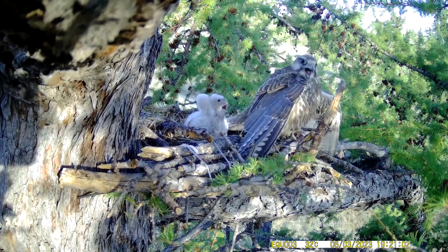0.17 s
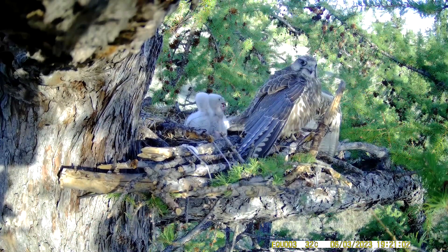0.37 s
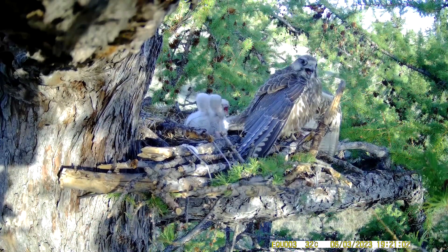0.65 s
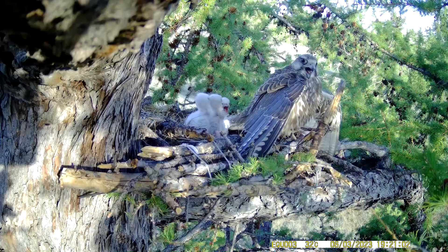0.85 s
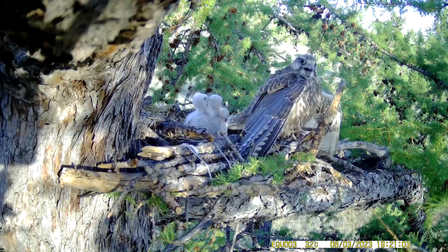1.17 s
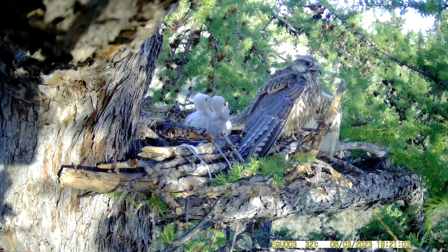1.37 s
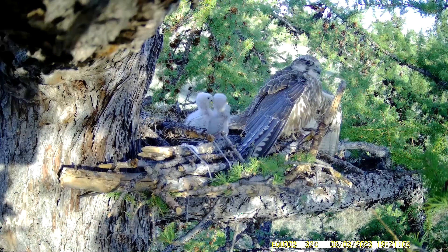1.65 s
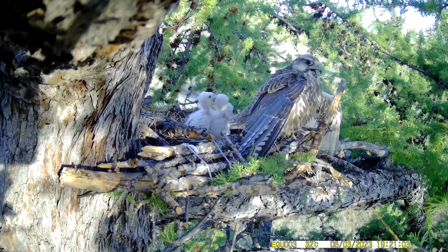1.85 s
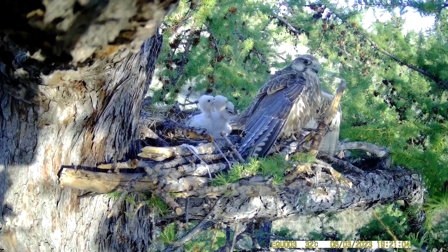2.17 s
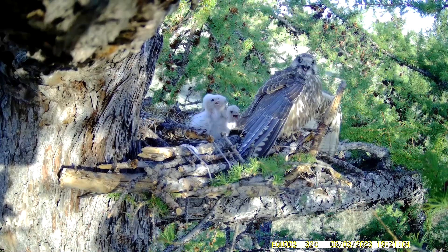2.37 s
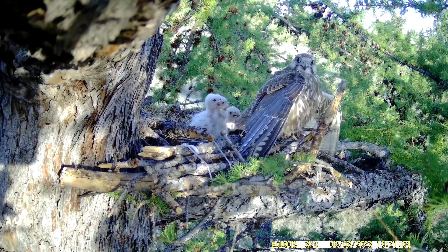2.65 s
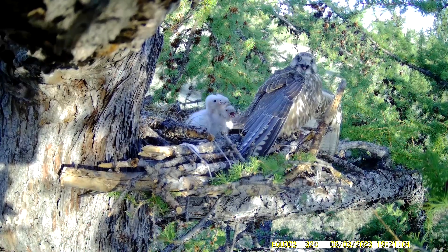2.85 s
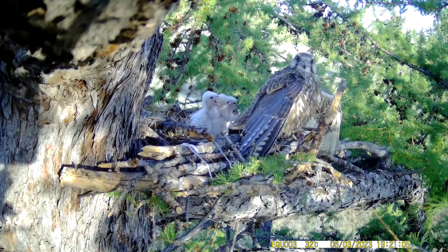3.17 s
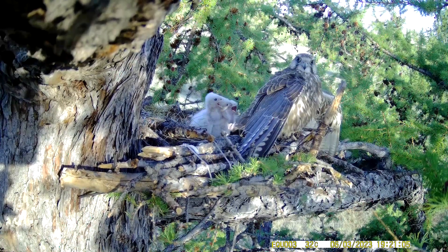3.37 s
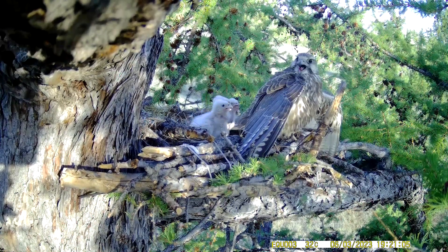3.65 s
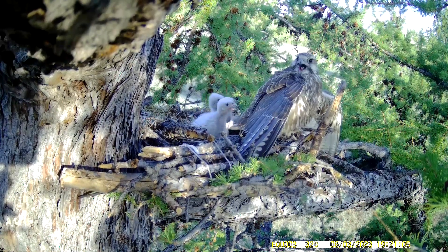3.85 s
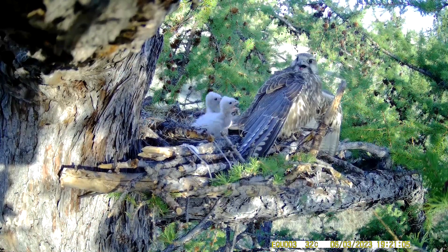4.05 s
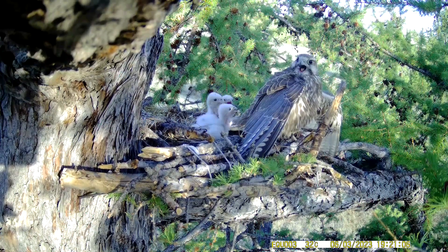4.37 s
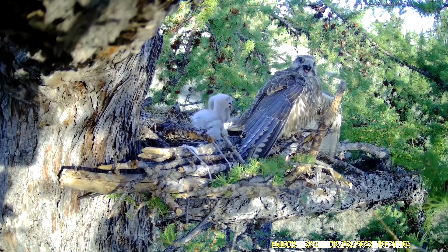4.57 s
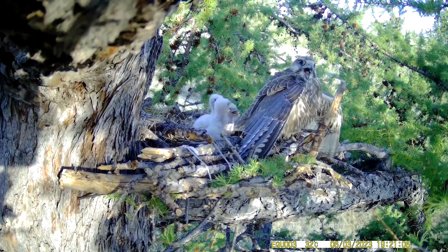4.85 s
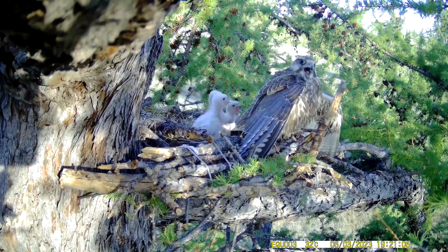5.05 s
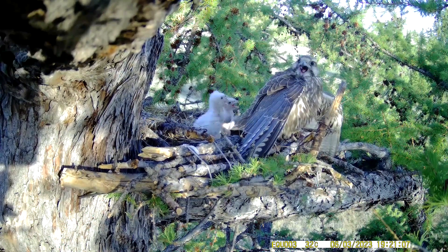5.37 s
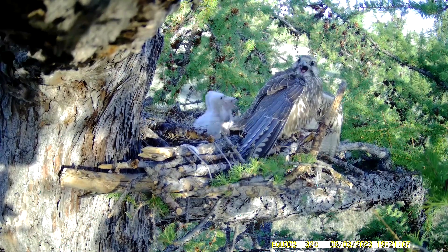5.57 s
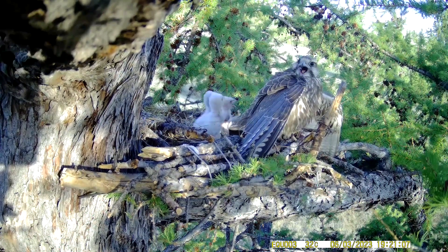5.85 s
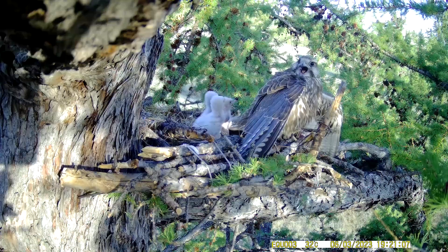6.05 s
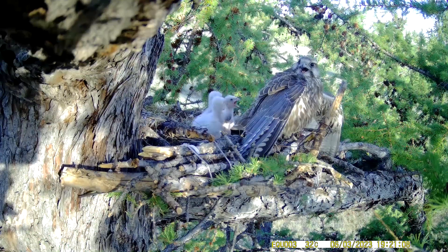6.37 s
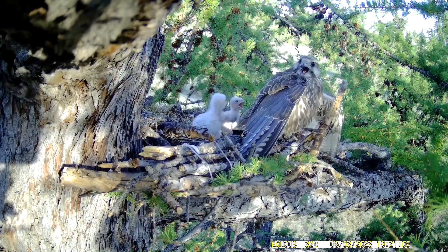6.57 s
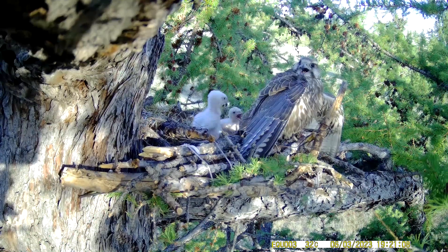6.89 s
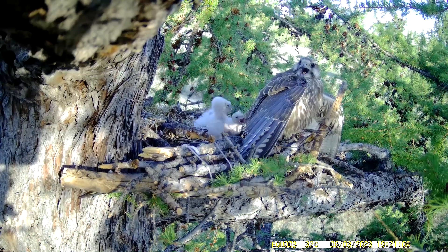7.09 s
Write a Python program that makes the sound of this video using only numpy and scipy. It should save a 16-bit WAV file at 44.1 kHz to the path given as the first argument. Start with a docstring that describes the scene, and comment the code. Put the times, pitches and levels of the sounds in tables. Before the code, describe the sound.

A falcon screams harshly over and over at close range, wheezing faintly between calls, over a low forest rumble.

```python
"""Over a low forest rumble, a falcon stutters into the first of thirteen screams, at its nest high in a
conifer, close to a trail camera's microphone. Each time the syrinx pops open and catches on a clear,
rising tone, turns harsh under strain and cracks as the pressure fails and the pitch falls away.
Trunks echo faintly, soft buffets thump on the camera, and between screams the bird gulps wheezing air."""
import sys
import numpy as np
from scipy import signal
from scipy.fft import rfft, irfft, next_fast_len
from scipy.io import wavfile
from scipy.ndimage import uniform_filter1d

SR = 44100
rng = np.random.default_rng(int(sys.argv[2]) if len(sys.argv) > 2 else 0)


def master(y):
    """Save y as 16-bit WAV."""
    cut = np.clip(np.atleast_2d(y).T, -1, 1)
    pcm = np.round(cut * 32767)  # scale
    wavfile.write(sys.argv[1], SR, pcm.astype(np.int16))


N = 318400
TIME = np.arange(N) / SR

# The ragged catch before each tone: first_pop_s, level_db, ragged_until_s
CATCH_POPS = [(.004, -22, .022), (.484, -24, .505), (1.144, -24, 1.175), (1.745, -23, 1.772),
              (2.207, -26, 2.232), (2.711, -20, 2.74), (3.429, -27, 3.455), (4.191, -23, 4.208),
              (4.765, -24, 4.782), (5.225, -25, 5.245), (5.817, -26, 5.83), (6.388, -26, 6.403),
              (6.923, -24, 6.942)]
# The course of each scream: start_s, end_s, climb_from_hz, climb_to_hz, bend (1 = straight climb),
# offset_hz (until the register jump), jump_after_s, fall_s, fundamental_db, second_db, second_swell_s
SCREAM_SHAPES = [(0.01, 0.324, 1164, 1212, 1.07, -20.0, 0.18, 0.062, -24, -21, 0.032),
                 (0.491, 0.943, 1097, 1244, 1.34, -16.0, 0.0233, 0.063, -23.5, -18, 0.046),
                 (1.151, 1.484, 1158, 1217, 1.17, -49.0, 0.21, 0.069, -25.5, -21.5, 0.042),
                 (1.749, 2.043, 1063, 1126, 1.45, -6.0, 0.035, 0.041, -31.5, -20.5, 0.16),
                 (2.217, 2.555, 1062, 1169, 1.95, 9.0, 0.054, 0.07, -27.3, -16, 0.11),
                 (2.713, 3.071, 1100, 1196, 1.96, -20.0, 0.22, 0.076, -26, -17.5, 0.12),
                 (3.436, 4.064, 1057, 1241, 1.62, 4.0, 0.075, 0.056, -24.0, -19.4, 0.13),
                 (4.198, 4.637, 1146, 1279, 0.86, 110.0, 0.057, 0.058, -22.5, -21.5, 0.083),
                 (4.773, 5.118, 1178, 1257, 0.8, 97.0, 0.042, 0.066, -23.9, -20.0, 0.27),
                 (5.231, 5.693, 1126, 1251, 2.74, 42.0, 0.061, 0.043, -24, -21.5, 0.069),
                 (5.825, 6.268, 1182, 1305, 0.71, 85.5, 0.035, 0.1, -21.5, -21.5, 0.071),
                 (6.397, 6.795, 1186, 1281, 0.82, 98.0, 0.041, 0.081, -22.5, -22.5, 0.068),
                 (6.928, 7.298, 1145, 1259, 1.43, 33, 0.069, 0.074, -23.5, -18.5, 0.31)]


def undb(db):
    """Decibels to gain."""
    return 10 ** (np.asarray(db) / 20)


def unit(x):
    """Scale to rms 1."""
    return x / np.sqrt(np.mean(x ** 2))


def colour(x, points):
    """Causal filter whose gain follows (frequency_hz, gain_db) points."""
    hz, db = np.transpose(points)
    half = next_fast_len(N, real=True)
    size = 2 * half
    bin_hz = np.arange(half + 1) * SR / size
    gain_db = np.interp(np.log(bin_hz + 1), np.log(hz), db)
    cepstrum = irfft(np.log(undb(gain_db)))
    cepstrum[1:half] *= 2  # folding the cepstrum gives minimum phase
    cepstrum[half + 1:] = 0
    return irfft(rfft(x, size) * np.exp(rfft(cepstrum)))[:N]


def noise(points):
    """Coloured noise of rms 1."""
    return unit(colour(rng.standard_normal(N), points))


def walk(rate_hz):
    """Smooth random wander of rms 1, mostly slower than rate_hz."""
    lowpass = signal.butter(2, rate_hz, fs=SR, output="sos")
    return unit(signal.sosfilt(lowpass, rng.standard_normal(N)))


def gate(start, end, edge_s):
    """1 between two times, with soft edges centred on them."""
    inside_s = np.minimum(TIME - start, end - TIME)
    return .5 + .5 * np.sin(np.pi * np.clip(inside_s / edge_s, -.5, .5))


def forest(air_db=-66, rumble_db=-55):
    """The wood around the nest: a faint, steady hiss over a low rumble that swells and sinks."""
    # Spectra of the hiss and the rumble: frequency_hz, gain_db
    air_spectrum = [(100, 0), (300, 0), (600, 0), (1000, -1), (2000, -3), (4500, -5), (6500, -7),
                    (11000, -8), (15500, -9)]
    rumble_spectrum = [(15, -3.5), (32, -3.5), (60, -8), (110, -19.5), (200, -29), (400, -35), (1500, -71)]
    # Slow course of the rumble: time_s, gain_db
    swell = [(0, 3.5), (.6, 5), (1.5, 3.5), (2.3, 6), (2.8, 2), (4.4, -0.5), (5.2, 3), (6.1, 1.5), (7.2, 4)]
    swell_db = np.interp(TIME, *np.transpose(swell))
    air = noise(air_spectrum) * undb(air_db)
    rumble = noise(rumble_spectrum) * undb(rumble_db + swell_db + 2 * walk(26))
    return air + rumble


def syrinx_pops(gap_s=0.0056, quicken=0.76, ring_hz=2250, ring_s=0.0012, attack_s=0.00025, count=4):
    """As each tone catches, the syrinx flaps open a few times, faster and faster."""
    kicks = np.zeros(N)
    for pop_s, level_db, _ in CATCH_POPS:
        for k in range(count):
            kicks[int(pop_s * SR)] += undb(level_db)
            pop_s += gap_s * quicken ** k
    t = TIME[:SR // 50]
    phase = 2 * np.pi * ring_hz * t
    ring = np.sin(phase) + .28 * np.sin(phase / 2) + .14 * np.sin(2 * phase)
    envelope = np.exp(-t / ring_s) * (1 - np.exp(-t / attack_s))
    return signal.fftconvolve(kicks, ring * envelope)[:N]


def voicing(rise_s=0.0095, fall_s=0.01):
    """1 while the syrinx sounds, 0 between screams, with short ramps."""
    ramps_s = np.array([-rise_s, rise_s, -fall_s, fall_s]) / 2
    return sum(np.interp(TIME, ramps_s + [start, start, end, end], [0, 1, 1, 0])
               for start, end, *_ in SCREAM_SHAPES)


def scream_contours(scoop_hz=101, scoop_s=.0105, jump_s=.0088, fall_hz=175.2, swell_s=.1):
    """Pitch and levels: each scream scoops up, jumps register, climbs, and drops as the pressure fails."""
    shapes = np.array(SCREAM_SHAPES)
    current = np.maximum(np.searchsorted(shapes[:, 0] - .02, TIME) - 1, 0)
    (start, end, climb_from_hz, climb_to_hz, bend, offset_hz, jump_after_s, fall_s,
     fundamental_db, second_db, second_swell_s) = shapes[current].T
    age = np.clip(TIME - start, 0, end - start)
    to_climb_hz = (climb_to_hz - climb_from_hz) * (1 - age / (end - start)) ** bend
    register_hz = offset_hz * .5 * (1 - np.tanh((age - jump_after_s) / jump_s))
    scoop = np.exp(-age / scoop_s)
    fall = np.clip(1 - (end - TIME) / fall_s, 0, 1) ** 3
    pitch_hz = climb_to_hz - to_climb_hz + register_hz - scoop_hz * scoop - fall_hz * fall
    # Both partials swell in and grow louder with the climb, the second less closely.
    slack_hz = to_climb_hz - np.minimum(register_hz, 0)
    fundamental_db = fundamental_db - .0387 * slack_hz - 4.5 * np.exp(-age / swell_s)
    second_db = second_db - .0311 * to_climb_hz - 10 * np.exp(-age / second_swell_s)
    second_db += .0059 * np.maximum(register_hz, 0)  # a little stronger in the high register
    bright_db = -6 + .23 * (second_db - fundamental_db)  # overtones partly follow the second's lead
    fundamental_db -= 10 * scoop + 18.5 * fall
    second_db -= 5 * fall  # outlasts the fundamental
    return pitch_hz, fundamental_db, second_db, bright_db


def throat(x):
    """Throat and open beak shape the sound broadly; the windpipe adds narrow peaks and notches."""
    # Response of throat and beak: frequency_hz, gain_db
    throat_response = [(300, -32), (540, -10), (640, -14), (900, -34), (1250, 9.5), (1750, -1), (2350, -20),
                       (2900, 0.5), (3350, -2), (3800, 1), (4750, 1), (5400, -11), (7400, -15),
                       (11000, -23), (12300, -34.5), (15500, -43)]
    # Windpipe peaks and notches: centre_hz, width_hz, centre_gain
    windpipe = [(2715, 233, 6.28), (3578, 142, 0.063), (6007, 170, 0.32), (8370, 1020, 0.4),
                (8710, 234, 3.2), (10050, 680, 0.49)]
    x = colour(x, throat_response)
    for centre_hz, width_hz, gain in windpipe:
        band = signal.lfilter(*signal.iirpeak(centre_hz, centre_hz / width_hz, fs=SR), x)
        x = x + (gain - 1) * band
    return x


def screams(surge_hz=12, surge_db=3, crack_s=0.028, quarter_db=-21, air_db=-13, hollow_db=-37):
    """The syrinx buzzes at the pitch; under strain its cycles alternate and scatter, and air rushes by."""
    # Strained stretches: start_s, end_s, period_doubling_db, roughness (0-1)
    strains = [(.18, .29, -30, .3), (.76, .91, -27, .45), (1.92, 2.0, -19, .05), (2.32, 2.375, -13, .02),
               (2.77, 2.9, -28, .15), (3.66, 3.83, -24, .5), (3.83, 4.04, -19, .85), (4.35, 4.55, -13, .5),
               (4.55, 4.61, -20, 1), (4.93, 5.09, -19, .45), (5.39, 5.66, -14, .75), (5.94, 6.1, -22, .5),
               (6.1, 6.24, -17, .8), (6.58, 6.77, -19, .55), (7.06, 7.24, -16, .6)]
    # Faint hollow rush under the tone: frequency_hz, gain_db
    hollow_spectrum = [(250, -13), (450, -15), (560, -9.5), (700, -3), (1000, -7), (2000, -20)]
    pitch_hz, fundamental_db, second_db, bright_db = scream_contours()
    catching = sum(gate(pop_s, until_s, .005) for pop_s, _, until_s in CATCH_POPS)
    # As the pressure drops at the end of a scream, the tone cracks an octave down.
    cracking = sum(gate(end - crack_s, end + .023, .027) for _, end, *_ in SCREAM_SHAPES)
    doubling = undb(-29) + undb(-8) * cracking
    strain = np.zeros(N)
    for start, end, doubling_db, roughness in strains:
        strained = gate(start, end, .068)
        strain += roughness * strained
        doubling += undb(doubling_db) * strained
    fatigue = uniform_filter1d(strain, SR // 4)
    crackling = cracking * (.3 + 2.2 * fatigue)  # after long strain the crack breaks up
    surge = strain - fatigue  # a sudden harder push
    pitch_hz += surge_hz * surge
    second_db += surge_db * surge

    rough = .28 + strain + catching + .65 * crackling
    quaver = rough * walk(26)  # an unsteady push moves pitch and loudness together
    jitter = (.0035 * rough + .028 * catching + .016 * crackling) * walk(500)
    phase = 2 * np.pi * np.cumsum(pitch_hz * (1 + .0065 * quaver + jitter)) / SR
    shimmer = 1 + .13 * rough ** 2 * walk(300)
    second_gain = undb(second_db + .7 * quaver) * shimmer
    tone = undb(fundamental_db) * np.cos(phase) + second_gain * np.cos(2 * phase + 1)
    # The higher an overtone, the less steady its strength and timing.
    flutter = .003 * walk(380)
    overtones = sum(undb(.2 * k * walk(18)) * np.cos(k * (phase + (k - 3) * flutter))
                    for k in range(3, 14))
    pulses = np.cos(phase) + np.cos(2 * phase) + overtones
    # Strong and weak cycles come and go, adding tones halfway between the partials and at the quarters.
    halves = doubling * undb(3.5 * walk(25) - 1.5) * np.cos(phase / 2 + .6 * walk(60))
    quarters = undb(quarter_db) * rough * walk(54) * np.cos(phase / 4 + .14 * walk(40))
    spurts = undb(air_db + 3 * walk(45))
    air = rough * spurts * rng.standard_normal(N) * (1 + np.cos(phase))
    rasp = (overtones + pulses * (halves + quarters) + air) * undb(fundamental_db + bright_db)
    hollow = noise(hollow_spectrum) * undb(fundamental_db + hollow_db)
    voiced = voicing()
    return np.sqrt(2) * ((tone + hollow) * voiced + throat(rasp * voiced))


def trunk_echoes(bird, echo_db=-38, count=60, t60_s=.7, cutoff_hz=4000):
    """Sparse, dull reflections come back to the microphone from the trees around."""
    delay_s = rng.uniform(.015, .4, count)
    response = np.zeros(SR // 2)
    response[(delay_s * SR).astype(int)] = rng.standard_normal(count) * undb(-60 * delay_s / t60_s)
    echoes = signal.fftconvolve(bird, response / np.linalg.norm(response))[:N]
    return undb(echo_db) * signal.sosfilt(signal.butter(2, cutoff_hz, fs=SR, output="sos"), echoes)


def camera_thumps(gain_db=-3):
    """Short, dull buffets on the camera, right at the microphone."""
    # The buffets: centre_s, relative_level_db, half_width_s
    buffets = [(0.08, -39.5, 0.013), (0.426, -35.5, 0.0031), (0.457, -38.5, 0.016), (1.722, -46, 0.014),
               (2.005, -45, 0.019), (2.166, -46, 0.0086), (5.206, -43, 0.011), (6.527, -30.5, 0.014),
               (6.595, -39, 0.037), (6.726, -29.5, 0.012), (6.856, -40, 0.014), (6.933, -32.5, 0.014),
               (6.982, -29, 0.01), (7.111, -34.5, 0.011)]
    # Their spectrum: frequency_hz, gain_db
    thud_spectrum = [(20, -9.5), (55, 9), (110, -2), (180, -15.5), (280, -35), (600, -51), (2000, -102)]
    thud = noise(thud_spectrum)
    thud /= np.sqrt(uniform_filter1d(thud ** 2, SR // 40) + 1e-9)  # even out the noise's own swells
    envelope = sum(undb(level_db) * np.exp(-((TIME - centre_s) / half_width_s) ** 2)
                   for centre_s, level_db, half_width_s in buffets)
    return undb(gain_db) * thud * envelope


def wheezes(rest_db=-68, edge_share=0.092):
    """The falcon gulps air through its open beak: a hiss, and a hoarse whistle where the airway narrows."""
    # Gulps and their whistles: start_s, end_s, hiss_db, first_hz, middle_hz, last_hz, whistle_db
    gulps = [(.33, .385, -54, 1417, 1384, 1090, -55), (.41, .48, -71, 1572, 1650, 1690, -62),
             (1.035, 1.13, -68, 1255, 1500, 1525, -57), (1.5, 1.69, -53, 1500, 1511, 1225, -51),
             (1.69, 1.76, -59, 1450, 1480, 1450, -61), (2.05, 2.135, -51, 1434, 1290, 1077, -47),
             (2.135, 2.22, -61, 1420, 1460, 1450, -58), (2.56, 2.72, -53, 1375, 1416, 1388, -52),
             (3.07, 3.23, -62, 1400, 1400, 1400, -67), (3.22, 3.37, -53, 1409, 1505, 1393, -56),
             (3.36, 3.39, -54, 1300, 1235, 1130, -45), (3.39, 3.44, -61, 1480, 1520, 1500, -59),
             (4.07, 4.15, -49, 1330, 1270, 1120, -47), (4.63, 4.67, -50, 1300, 1250, 1200, -59),
             (4.66, 4.76, -59, 1426, 1552, 1491, -59), (5.11, 5.15, -53, 1300, 1250, 1200, -59),
             (5.695, 5.735, -61, 1146, 1194, 1270, -51), (5.725, 5.8, -66, 1443, 1648, 1493, -60),
             (6.275, 6.385, -58, 1174, 1566, 1600, -55), (6.81, 6.915, -59, 1458, 1580, 1502, -61)]
    # Colour of the breath: frequency_hz, gain_db
    breath_spectrum = [(300, -21.5), (700, -16), (1050, -8.5), (1480, -4.5), (1950, -9), (2490, -7),
                       (3600, -12.5), (4650, -9.5), (5700, -20.5), (8500, -28), (15000, -41)]
    pitch_hz = np.full(N, float(gulps[0][3]))
    whistle_gain = np.zeros(N)
    flow = undb(rest_db)
    for start, end, hiss_db, first_hz, middle_hz, last_hz, whistle_db in gulps:
        flow = np.maximum(flow, undb(hiss_db) * gate(start, end, edge_share * (end - start)))
        inside = (TIME > start) & (TIME < end)
        progress = (TIME[inside] - start) / (end - start)
        glide = np.polyfit([0, .5, 1], [first_hz, middle_hz, last_hz], 2)
        pitch_hz[inside] = np.polyval(glide, progress)
        whistle_gain[inside] = undb(whistle_db) * np.sqrt(np.sin(np.pi * progress ** 1.54))  # peaks late
    hiss = noise(breath_spectrum) * (1 - voicing()) * flow * undb(1.2 * walk(50))
    phase = 2 * np.pi * np.cumsum(pitch_hz * (1 + .008 * walk(300))) / SR
    partials = sum(np.cos(k * phase) for k in range(1, 5))
    whistle = unit(colour(partials, breath_spectrum))
    return hiss + whistle * whistle_gain * undb(2 * walk(80))


def scene():
    """One microphone at the nest: the bird up close, its echoes, the buffets and the wood behind."""
    bird = screams() + syrinx_pops() + wheezes()
    return (bird + trunk_echoes(bird) + camera_thumps() + forest())[None]


def record(dry):
    """The camera cuts the highest treble steeply."""
    cutoff_hz = 15550
    return signal.sosfilt(signal.ellip(10, .1, 80, cutoff_hz, fs=SR, output="sos"), dry)


dry = scene()
out = record(dry)
master(out)
```